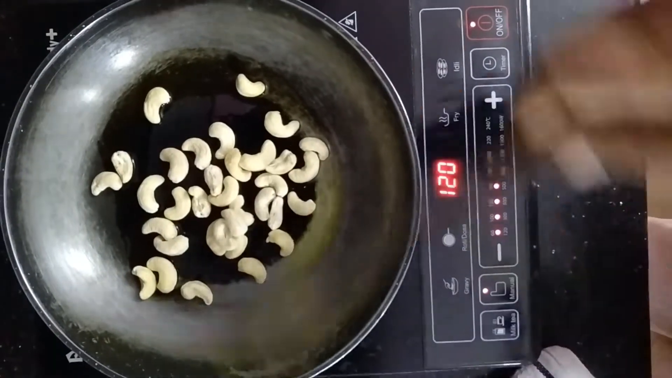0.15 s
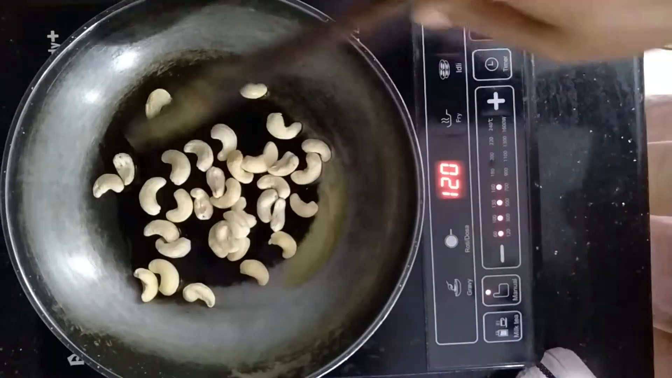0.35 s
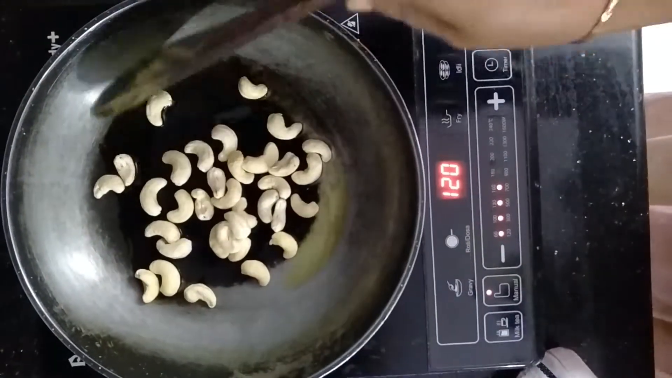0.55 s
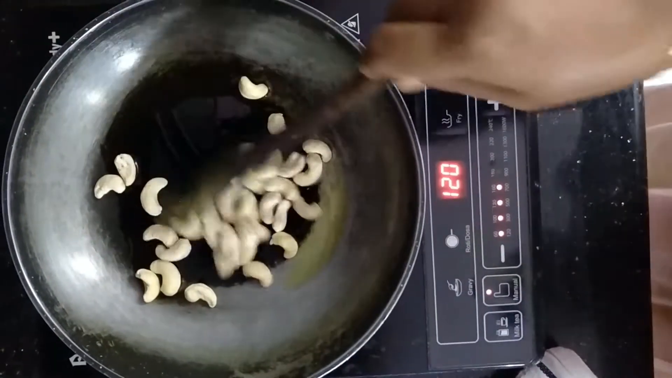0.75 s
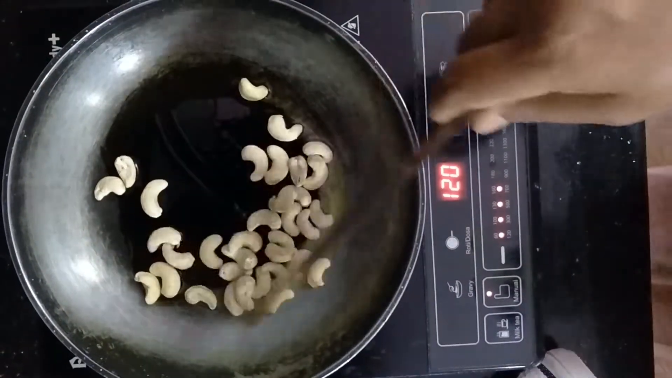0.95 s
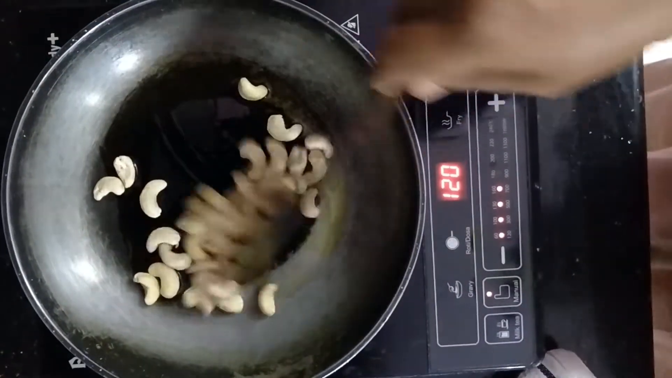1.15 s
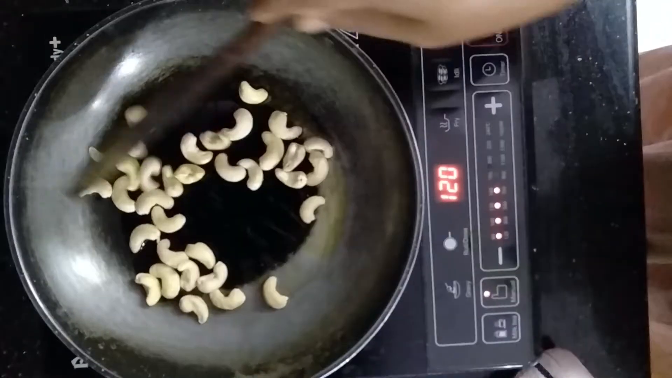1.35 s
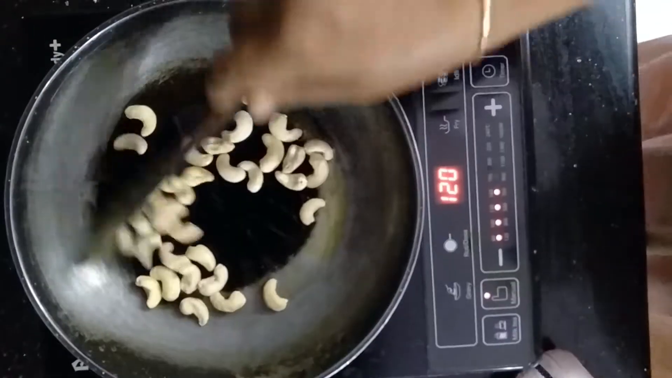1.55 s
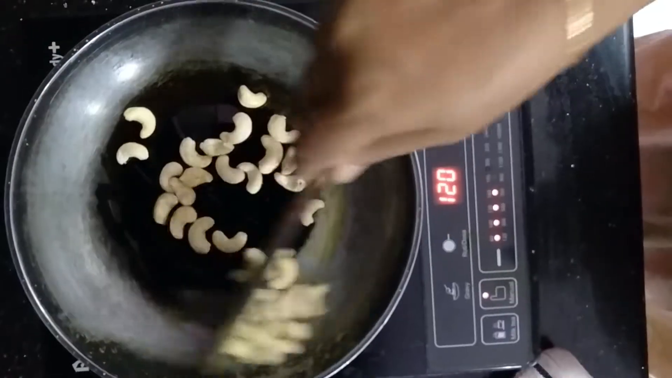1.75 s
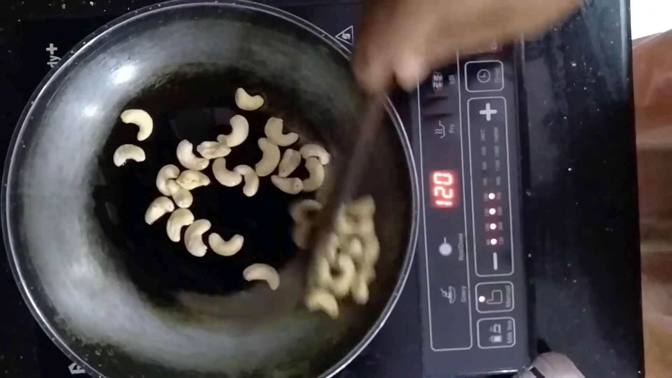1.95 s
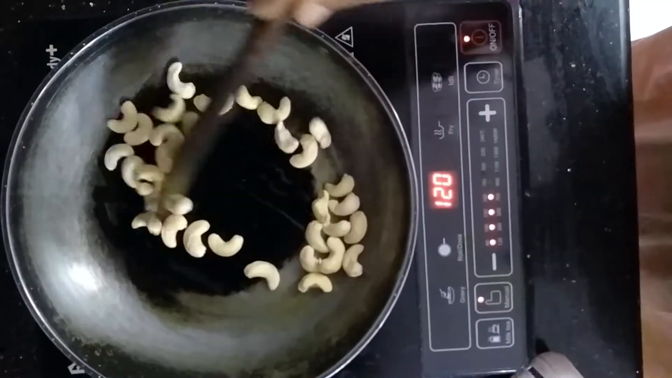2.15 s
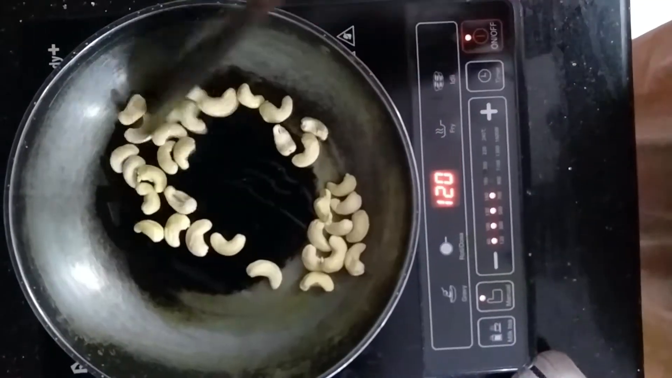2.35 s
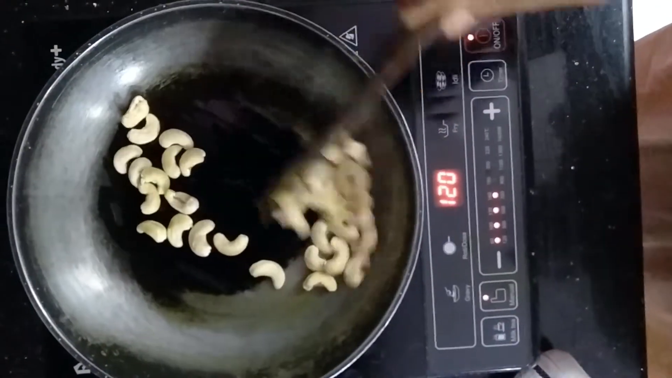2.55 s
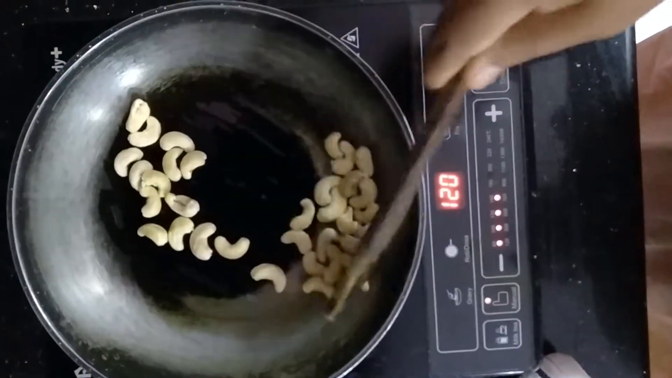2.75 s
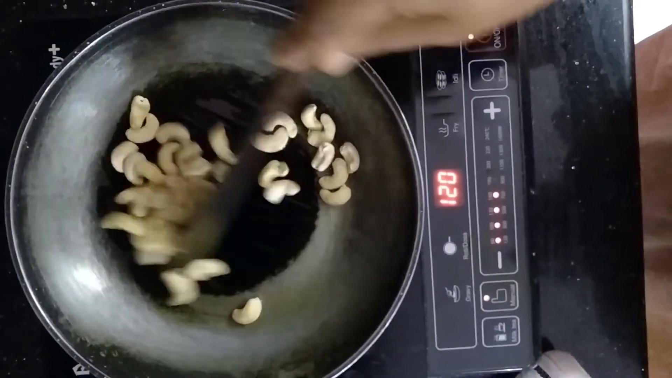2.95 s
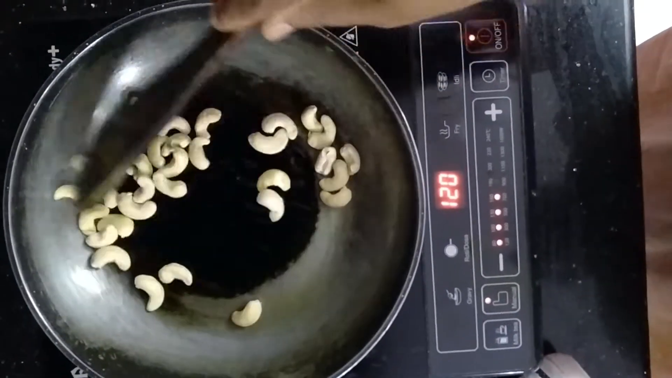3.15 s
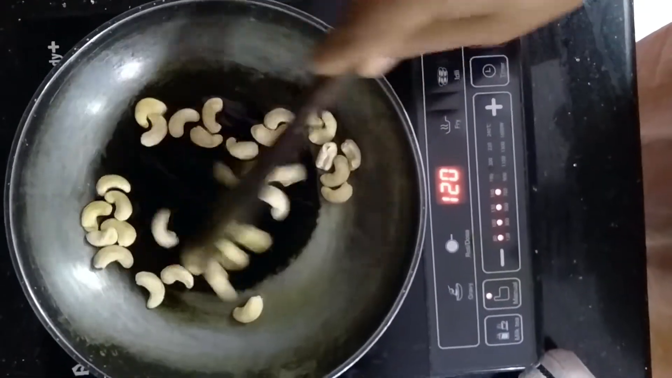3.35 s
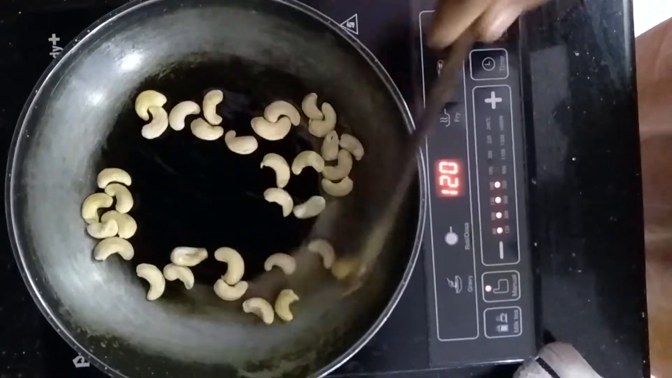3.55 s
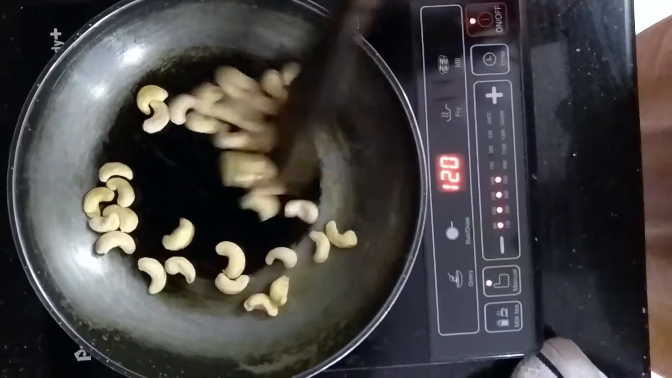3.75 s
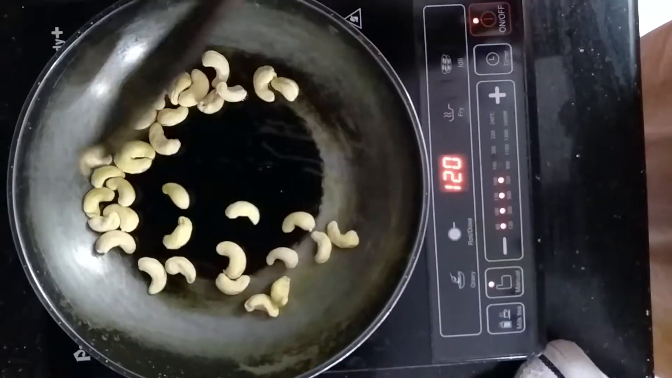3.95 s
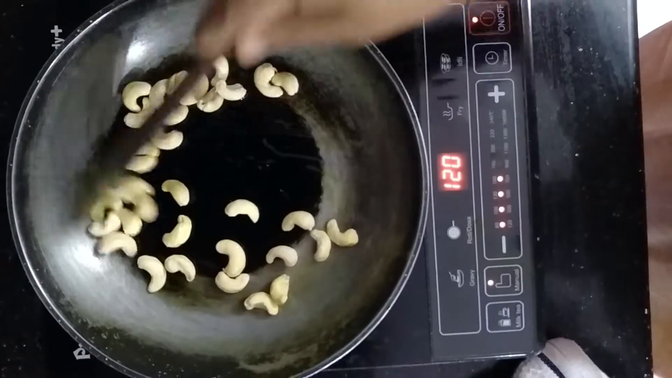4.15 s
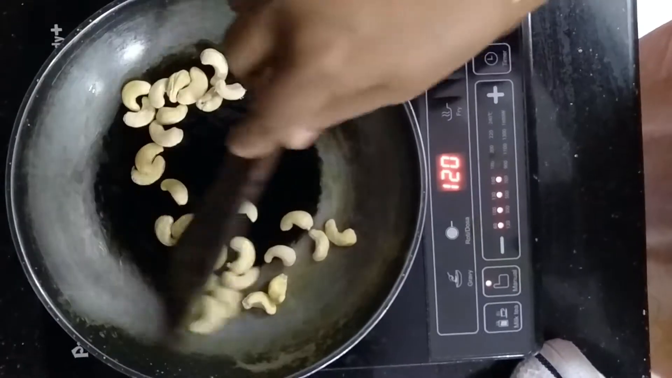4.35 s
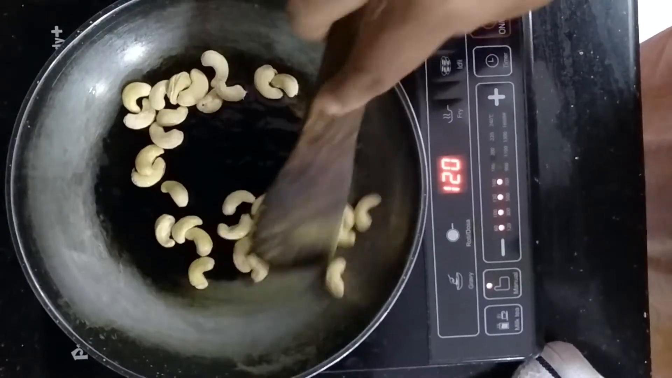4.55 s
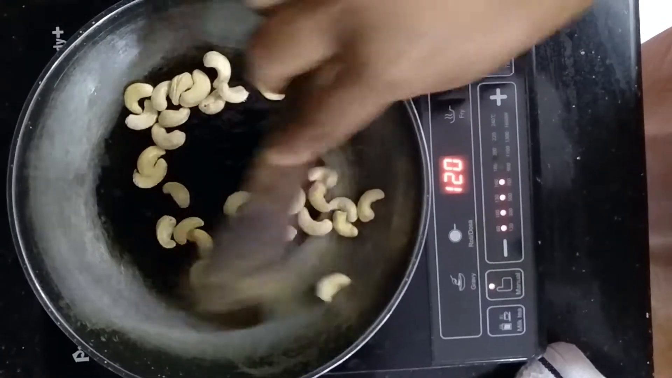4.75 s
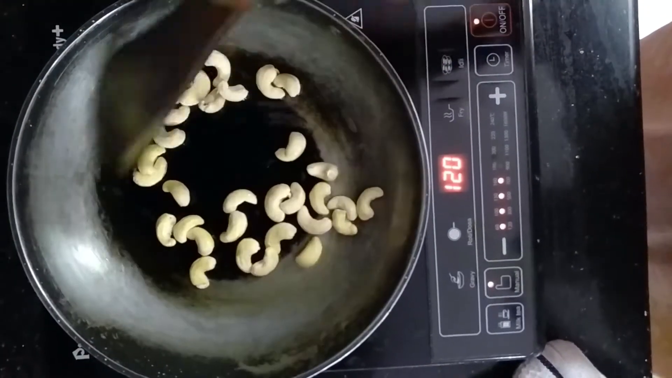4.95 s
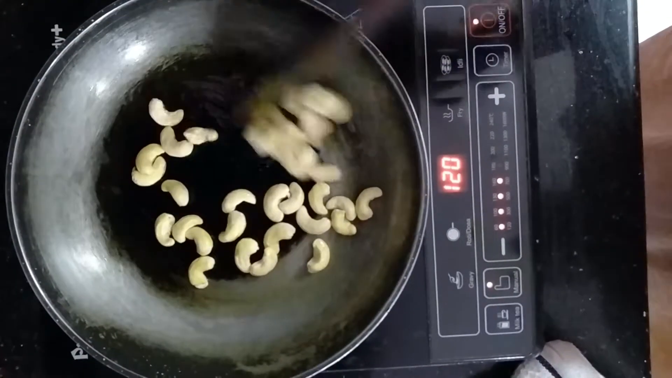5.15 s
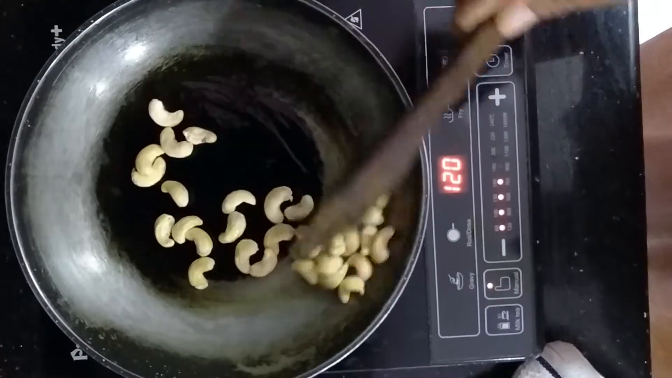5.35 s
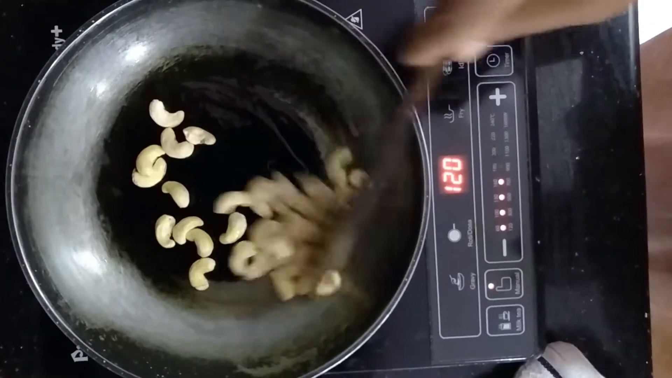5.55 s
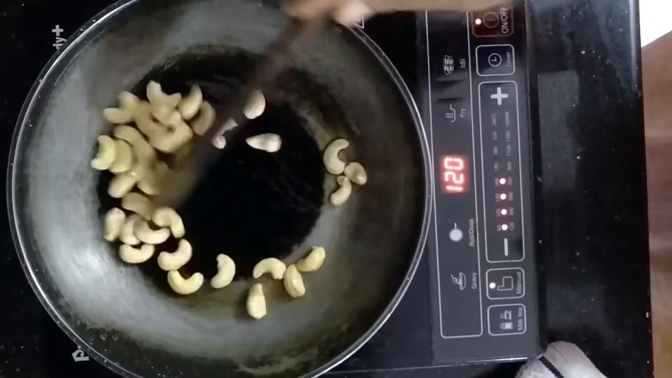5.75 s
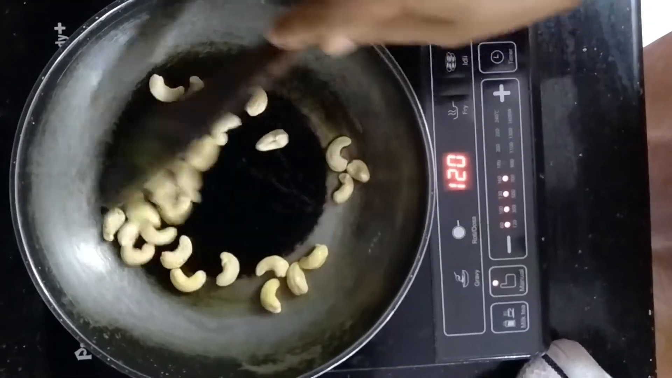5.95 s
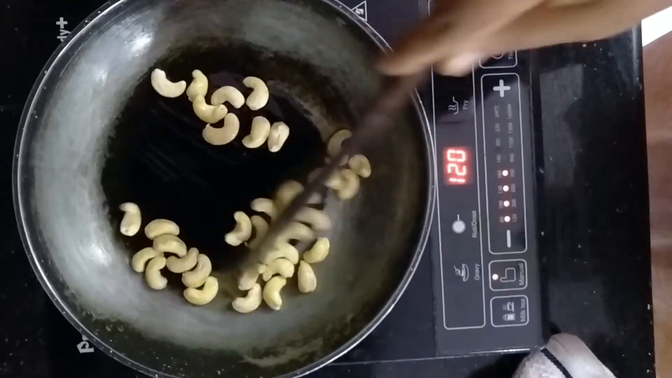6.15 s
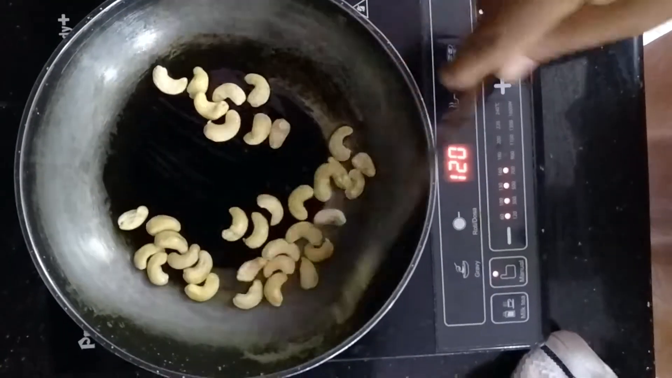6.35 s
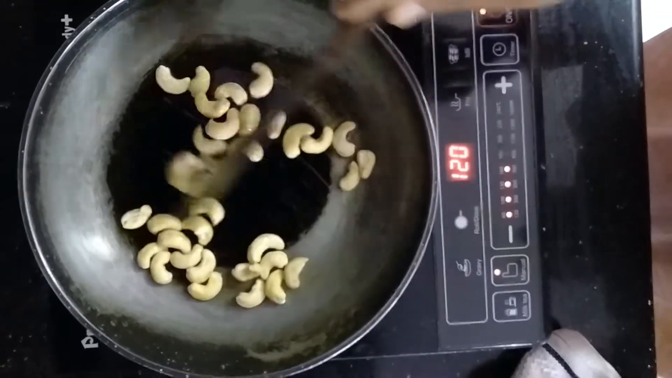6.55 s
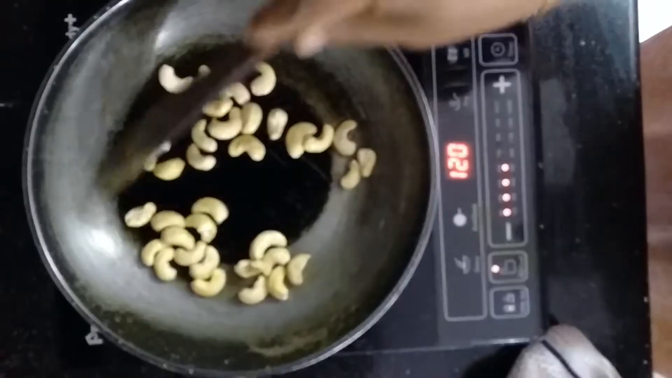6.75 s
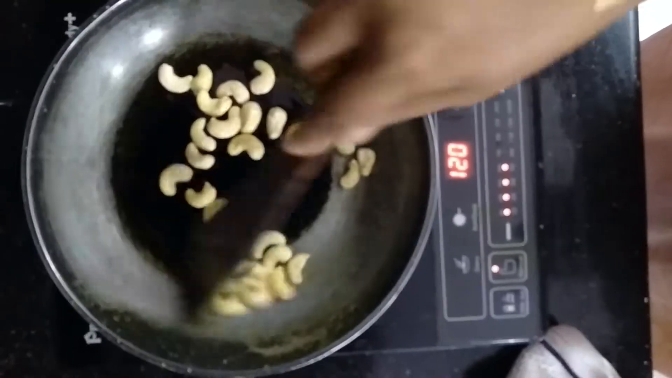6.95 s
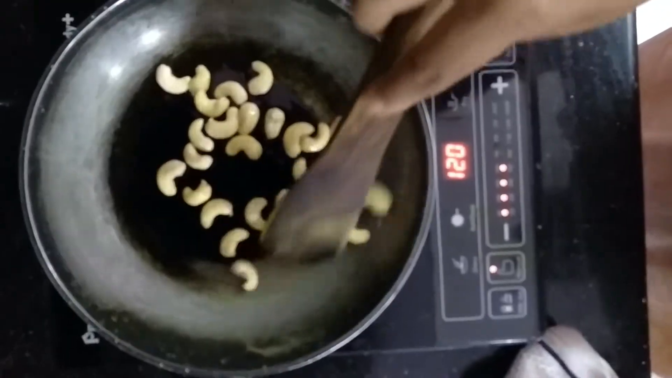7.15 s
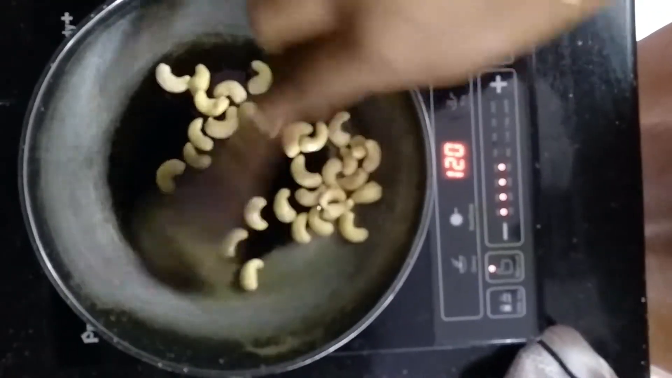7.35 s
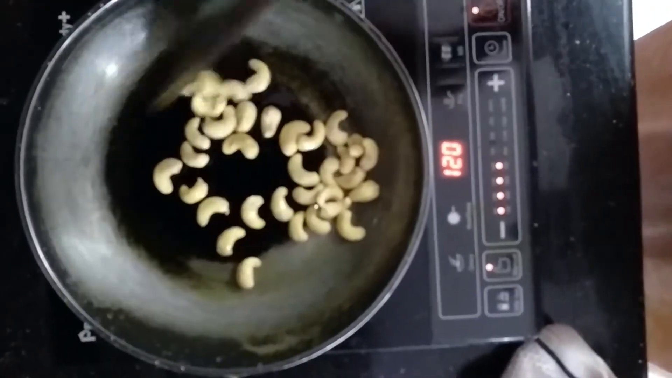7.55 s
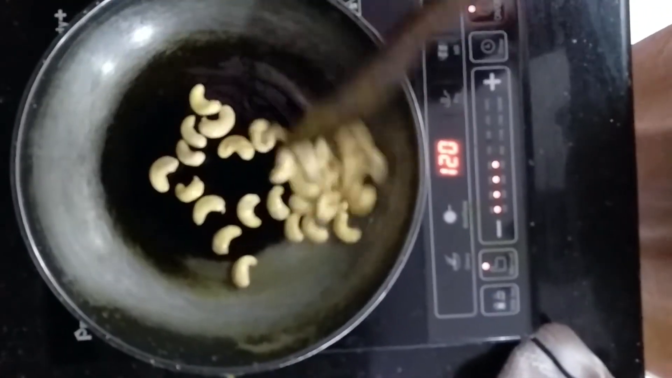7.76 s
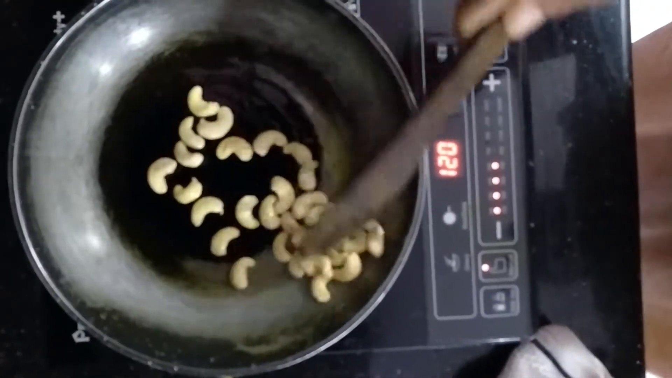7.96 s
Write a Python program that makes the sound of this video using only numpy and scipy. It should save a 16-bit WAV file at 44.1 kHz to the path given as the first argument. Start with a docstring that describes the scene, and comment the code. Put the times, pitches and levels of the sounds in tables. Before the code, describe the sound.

Nuts clack and ping in a metal pan as a wooden spatula stirs briskly, with hollow knocks, faint fizzing fat and soft fan noise.

```python
"""A wooden spatula works nuts in hot fat, in a steel pan on an induction hob, in a small kitchen.
From the start the blade drags (random slips, nut pings and fat clicks) and squeals now and then (narrow noise).
The hob whines in puffs at twice the mains rate, over soft fan noise and a hum that comes through in stretches.
From about 0.55 s nuts clack (noise bursts and steel pings) and wood knocks (a thud, then ringing pan tones).
The room answers these blows with a short tail; the hardest knocks overload a small microphone."""
import sys
import numpy as np
from scipy import signal
from scipy.fft import rfft, irfft
from scipy.io import wavfile
from scipy.ndimage import uniform_filter1d

SR = 44100
rng = np.random.default_rng(int(sys.argv[2]) if len(sys.argv) > 2 else 0)


def persist_wave(psi):
    """Save psi, clipped to +-1, as 16-bit WAV."""
    counts = np.round(np.clip(psi, -1, 1) * 32767).astype(np.int16)
    wavfile.write(sys.argv[1], SR, np.atleast_2d(counts).T)


N = 356769

# drags of the blade: start [t/s], length [t/s], then pan rumble, wood rasp, nut rattle, fat fizz [level/dB]
DRAGS = [(0.0, 0.0035, -45, -34, -49.5, -64), (0.67, 0.16, -41.5, -45, -34.5, -37),
         (1.097, 0.12, -23, -23.5, -31.5, -34.5), (1.23, 0.17, -44.5, -38, -39.5, -66),
         (1.55, 0.19, -39.5, -48, -40, -37), (2.04, 0.058, -61, -38.5, -30, -38),
         (2.44, 0.12, -77, -34.5, -43, -39.5), (2.8, 0.13, -34.5, -47, -36.5, -49),
         (2.94, 0.088, -50, -29, -34, -68), (3.18, 0.25, -45, -40.5, -49, -71),
         (3.66, 0.23, -42.5, -45, -36.5, -44.5), (4.085, 0.074, -37, -31.5, -43, -39.5),
         (4.22, 0.25, -47.5, -54, -76, -39.5), (4.51, 0.029, -48, -62, -45, -33.5),
         (4.85, 0.33, -53, -58, -59, -38.5), (5.06, 0.29, -48, -52, -42, -62),
         (5.565, 0.19, -38, -40.5, -35.5, -49.5), (6.08, 0.14, -50, -42, -44.5, -76),
         (6.44, 0.16, -44, -39, -45.5, -55.5), (6.85, 0.13, -41.5, -35, -40.5, -34.5),
         (6.97, 0.25, -47, -47, -46.5, -41), (7.475, 0.15, -70, -69, -55.5, -31),
         (7.62, 0.33, -52, -52.5, -40, -56)]
# between drags: rumble, rasp, rattle, fizz [level/dB]
DRAG_REST = (-55, -85, -62, -60)
DRAG_RISE_S, DRAG_FALL_DB_PER_S = 0.015, 183.5
RASP_HZ, RASP_OCTAVES, SLIPS_PER_S = 1450, 0.75, 600
# tones of the pan on the glass top: pitch [f/Hz], strength [level/dB], basic time to fade by 60 dB [t/s]
PAN_TONES = [(298, -8.5, 0.29), (382.5, 3, 0.1), (467.4, 3, 0.2), (563, 0.5, 0.24), (754, -1, 0.054),
             (811, -0.5, 0.19), (910, 2.5, 0.066), (993, -2.5, 0.044), (1330, -10, 0.24), (1613, 8, 0.0063)]
# tones of the steel when a nut hits it: pitch [f/Hz], strength [level/dB], basic time to fade by 60 dB [t/s]
STEEL_TONES = [(1576, -0.5, 0.058), (2043, -3, 0.062), (2452, 0, 0.032), (3036, -1.5, 0.047),
               (3968, -0.5, 0.066), (4870, -10.5, 0.06), (5790, -5.5, 0.057), (6990, -13, 0.054),
               (8720, -6.5, 0.056), (10170, -5, 0.081)]
# tone colour of the nut rattle: frequency [f/Hz], relative strength per Hz [level/dB]
RATTLE_COLOUR = [(700, -6), (1150, -25), (1600, 9.5), (2200, -1), (3000, 1), (4000, 10), (5900, 4),
                 (8000, -6.5), (12000, -2.5), (16000, -24)]
# tone colour of the fizzing fat: frequency [f/Hz], relative strength per Hz [level/dB]
SIZZLE_COLOUR = [(3500, -51), (5500, -14), (7200, -15.5), (8600, -5.5), (10200, -2.5), (12000, -7.5),
                 (14700, -12.5), (15900, -41)]
# thin fuzzy tones of the blade edge: start [t/s], end [t/s], pitch [f/Hz], strength [level/dB]
SQUEALS = [(0, 0.014, 2030, -28), (0.536, 0.862, 5890, -43.5), (1.397, 1.507, 5280, -43.5),
           (1.802, 2.06, 3970, -43.5), (3.855, 3.946, 1690, -28), (7.051, 7.52, 3520, -42.5),
           (7.498, 7.606, 5740, -49)]

POWER_PULSES_PER_S = 99.6  # twice the mains rate
# the two tones of the whine: pitch [f/Hz], width of the first filter [f/Hz]
WHINE_TONES = [(12124, 48), (12620, 90)]
# surges of the whine: start [t/s], length [t/s], lower tone, upper tone [level/dB]
WHINE_SURGES = [(0.0, 0.071, -48, -56), (0.22, 0.028, -39.5, -61), (0.385, 0.14, -35.5, -42),
                (0.78, 0.16, -37, -53), (1.05, 0.86, -47, -68), (3.215, 0.69, -38, -40.5),
                (4.1, 1.24, -45.5, -60), (7.19, 0.22, -40, -36)]
# between surges: lower tone, upper tone [level/dB]
WHINE_REST = (-56, -61)
WHINE_RISE_S, WHINE_FALL_DB_PER_S = 0.012, 127
# stretches where the hum is heard: start [t/s], length [t/s], strength [level/dB]
HUM_STRETCHES = [(0.72, 0.27, -43.5), (1.36, 0.42, -46), (2.03, 0.4, -46.5), (4.42, 0.072, -48),
                 (5.06, 0.18, -48), (5.84, 0.25, -48), (6.86, 0.54, -45)]
HUM_RISE_S, HUM_FALL_DB_PER_S, HUM_REST_DB = 0.0083, 300, -65.5
# tone colour of the fan: frequency [f/Hz], relative strength per Hz [level/dB]
FAN_COLOUR = [(88, -70), (170, 1), (455, 1), (785, 13.5), (1110, -3), (1580, 6.5), (6190, -33.5),
              (10500, -10), (12500, -2.5), (15800, -10)]
FAN_DB = -49.5

# nuts struck or landing: time [t/s], strength [level/dB], clack pitch [f/Hz], tick against the clack [level/dB]
CLACKS = [(0.5507, -27, 1670, 2), (0.6732, -10, 2290, -11.5), (0.7687, -11, 2450, -4),
          (0.833, -16, 1430, -3), (0.868, -19.5, 2250, -7), (0.988, -28, 4270, -2.5),
          (1.1206, -9, 1250, -4.5), (1.154, -7, 1610, -0.5), (1.196, -14.5, 1960, -20),
          (1.214, -18.5, 5750, 3), (1.297, -23, 5670, -7), (1.3652, -9.5, 1790, -14),
          (1.535, -5.5, 1340, -9), (1.5506, -8.5, 2440, 3.5), (1.58, -15.5, 2660, -19),
          (1.6067, -17, 2060, -5), (1.6506, -12, 2420, -9), (1.7217, -20.5, 2200, -17),
          (1.886, -31, 3900, -30), (1.916, -24.5, 5600, -41), (1.964, -19, 2770, -11.5),
          (2.019, -19.5, 2200, -9), (2.0338, -13, 2650, -20), (2.0455, -29, 2100, -12),
          (2.0625, -7, 2100, -0.5), (2.0878, -16, 1820, -5), (2.098, -23, 2400, 4), (2.141, -30, 4300, 0),
          (2.1992, -22.5, 3760, -22), (2.208, -23, 5830, -28), (2.241, -19.5, 3800, -43),
          (2.396, -17.5, 3250, -6), (2.427, 1, 1510, -12.5), (2.4984, -15.5, 1490, -5),
          (2.5732, -20, 4130, -9), (2.7736, -19, 3180, -39), (2.817, -21, 3530, -29),
          (2.833, -22.5, 1690, 3.5), (2.858, -19.5, 2120, 0), (2.916, -25.5, 4100, -4),
          (2.9613, -11, 1400, 5), (2.986, -13.5, 1490, -26), (2.999, -32, 3000, 0.5),
          (3.026, -26, 3230, -5), (3.038, -13.5, 1520, -4), (3.09, -10.5, 1400, -8),
          (3.109, -18, 1650, -21), (3.1336, -14.5, 1490, -31), (3.1615, -25, 1720, -28),
          (3.189, -27, 2000, -34), (3.3005, -27.5, 4000, -5), (3.1998, -10, 1800, 2),
          (3.2287, -7, 2200, -10), (3.3513, -14.5, 1580, -23.5), (3.375, -22.5, 3630, -9),
          (3.398, -15, 1930, -11.5), (3.472, -15.5, 1940, -35), (3.5281, -12, 3680, -5),
          (3.6375, -11.5, 1270, -1.5), (3.705, -10, 2680, -2.5), (3.762, -13.5, 2370, -2),
          (3.7834, -19, 1760, -25), (3.794, -17, 1670, -13.5), (3.814, -17, 2380, -15),
          (3.838, -22, 3960, -19), (3.9498, -20, 1370, -6), (3.9783, -23, 1500, -50.5),
          (4.099, -13.5, 1480, -19), (4.1573, -10.5, 1880, -7.5), (4.2103, -11.5, 2090, -9),
          (4.2577, -23.5, 2900, 7), (4.3066, -23.5, 1720, -5), (4.426, -36.5, 3700, 5),
          (4.5175, -28.5, 4200, 1), (4.7584, -21.5, 1530, -2.5), (4.9419, -34.5, 5400, 8),
          (5.042, -12, 2370, 0), (5.075, -26, 2900, -17), (5.125, -19.5, 2140, -18),
          (5.143, -13.5, 2210, -3), (5.239, -30.5, 4540, 7), (5.266, -32, 4000, -20),
          (5.277, -19.5, 3170, -5), (5.285, -24.5, 3530, -10), (5.298, -40, 4000, -30),
          (5.329, -33, 4000, -31), (5.339, -22.5, 1640, -9), (5.377, -19, 1650, -1.5),
          (5.4603, -18, 1830, -16), (5.596, -18, 1710, -0.5), (5.62, -1.5, 1650, -14),
          (5.706, -28.5, 2500, 2), (5.7739, -17.5, 2370, -2), (6.094, -28, 1520, 0),
          (6.117, -18.5, 1500, -15), (6.199, -24, 3180, -37), (6.253, -26.5, 1670, -16),
          (6.2853, -26, 2880, -13), (6.3901, -5.5, 1300, -12), (6.474, -5.5, 2100, -6.5),
          (6.5064, -15.5, 1870, -13), (6.515, -9.5, 1970, -4.5), (6.569, -17.5, 1480, -42),
          (6.836, -16.5, 1410, -5.5), (6.88, -16, 2140, -24), (6.9116, -11.5, 2270, -4),
          (6.9204, -12.5, 2250, -4.5), (6.9352, -10.5, 2340, -5), (7.016, -15.5, 2230, -5.5),
          (7.044, -19, 2210, -23), (7.1021, -17.5, 1820, 2.5), (7.182, -21.5, 3070, -28),
          (7.2816, -19, 1700, -10), (7.3237, -4.5, 1470, -9), (7.6118, -9, 2530, -8),
          (7.638, -16, 2740, -10), (7.717, -14, 2100, -5.5), (7.794, -28, 2010, -22),
          (7.8421, -13, 2360, -10), (7.8701, -16, 1780, -11), (7.949, -25.5, 1680, -29),
          (8.0683, -14.5, 2440, -5)]
# spatula meets pan: time [t/s], strength [level/dB], contact pitch [f/Hz], ring against the thud [level/dB]
KNOCKS = [(0.554, -31, 690, 24.5), (0.572, -8, 555, -15), (0.775, -14.5, 1130, 1.5), (1.104, -23, 760, 18),
          (1.118, -16, 855, 10.5), (1.154, -18.5, 880, 10), (1.537, -6.5, 800, -1.5), (2.43, -2, 780, -6),
          (2.775, -4.5, 420, 2.5), (3.639, -2.5, 550, 1.5), (3.704, -9.5, 570, 0), (4.11, -4, 814, -4.5),
          (4.129, -11, 930, -1), (4.759, 3.5, 685, -10), (5.462, -9, 343, -5), (5.62, -2, 680, -10),
          (5.932, -22, 420, -0.5), (6.393, -1, 774, -12), (6.843, -7, 790, 1.5), (6.861, -4.5, 875, -0.5),
          (7.325, 4, 770, -10), (8.073, -44.5, 603, 25.5)]
# how long the room rings: frequency [f/Hz], time to fade by 60 dB [t/s]
ROOM_FADE = [(300, 0.41), (1000, 0.31), (3000, 0.15), (10000, 0.18)]
MICROPHONE_TOP_HZ = 15850


def gain_of(db):
    """Turns decibels into a factor for the wave."""
    return 10 ** (np.asarray(db) / 20)


def evened(x):
    """Brings a sound to an average (RMS) strength of 1."""
    return x / np.sqrt(np.mean(x ** 2) + 1e-20)


def read(points, hz):
    """Reads a curve between its points, with frequency on a logarithmic scale."""
    f, value = np.transpose(points)
    return np.interp(np.log(hz + 1), np.log(f + 1), value)


def add(mix, s, sound):
    """Adds a sound to the mix, starting s seconds in."""
    part = mix[round(s * SR):][:len(sound)]
    part += sound[:len(part)]


def band(x, hz, octaves):
    """Keeps one broad hump of frequencies around hz; octaves sets its width."""
    f = np.fft.rfftfreq(len(x), 1 / SR)
    hump = np.exp(-(np.log2((f + 1) / hz) / octaves) ** 2)
    return irfft(rfft(x) * hump, len(x))


def colour(x, points, patchy_db):
    """Shapes x by a spectrum, with random patches drifting over time and frequency."""
    hz, _, z = signal.stft(x, SR, nperseg=512, noverlap=384)
    patches = rng.standard_normal(z.shape[::-1]).T
    patches = uniform_filter1d(patches, size=5, axis=0)  # smooth over frequency
    patches = evened(uniform_filter1d(patches, size=22, axis=1))  # smooth over time
    gain = gain_of(read(points, hz)[:, None] + patchy_db * patches)
    shaped = signal.istft(z * gain, SR, nperseg=512, noverlap=384)[1]
    return evened(shaped[:N])


def grains(per_s, spread_db):
    """Sparse clicks at random times and of random sign; a few are large."""
    hit, size, sign = rng.random((N, 3)).T
    sizes = gain_of(-spread_db * np.log(np.maximum(size, 0.01)))
    return (hit < per_s / SR) * sizes * np.sign(sign - 0.5)


def resonate(x, hz, width):
    """A resonance of gain 1: shifts the pitch hz down to zero, smooths, and shifts back."""
    turn = np.exp(2j * np.pi * np.cumsum(hz * np.ones(len(x))) / SR)
    r = np.exp(-np.pi * width / SR)
    return 2 * (turn * signal.lfilter([1 - r], [1, -r], x / turn)).real


def gains_over_time(rows, rise_s, fall_db_per_s, rest_db):
    """Gain of each column: every row rises, holds for its length and dies away to a resting level."""
    t = np.arange(N) / SR
    power = gain_of(rest_db)[:, None] ** 2
    for start, length, *db in rows:
        rise = np.clip((t - start) / rise_s, 0, 1)
        fall = gain_of(-fall_db_per_s * np.clip(t - start - length, 0, 1))
        power = power + (gain_of(db)[:, None] * rise * fall) ** 2
    return np.sqrt(power)


def jostle(count):
    """Small nut collisions: noisy pings of several pitches, each in its own sparse train; the steel rings along."""
    t, out = np.arange(1024) / SR, np.zeros(N)
    for hz in np.geomspace(1400, 8000, count):
        ping = band(rng.standard_normal(len(t)), hz, 0.3)
        ping *= gain_of(-60 * t / 0.014) * (1 - np.exp(-t / 0.0004))
        out += signal.oaconvolve(grains(45, 3.5), ping / np.linalg.norm(ping))[:N]
    steel = sum(gain_of(db) * resonate(out, hz, 0.47 / t60) for hz, db, t60 in STEEL_TONES)
    return evened(out + 0.29 * steel)


def stroke():
    """The blade drags: slips shake the pan tones, wood rasps, nuts jostle over a gritty hiss, fat fizzes."""
    shake, press, push, fizz = gains_over_time(DRAGS, DRAG_RISE_S, DRAG_FALL_DB_PER_S, DRAG_REST)

    t = np.arange(round(0.2 * SR)) / SR
    pan = sum(gain_of(db - 60 * t / (0.28 * t60)) * np.sin(2 * np.pi * (hz * t + rng.random()))
              for hz, db, t60 in PAN_TONES)
    rumble = evened(signal.oaconvolve(grains(500, 0.79), pan)[:N])
    rasp = evened(band(grains(SLIPS_PER_S, 0.58), RASP_HZ, RASP_OCTAVES))

    busy = np.clip(push / gain_of(-45), 0, 1)  # nuts jostle fully only under a firm stroke
    grit = busy * jostle(count=16) + 0.45 * rng.standard_normal(N)
    rattle = colour(grit, RATTLE_COLOUR, 3)

    spit = grains(4000, 3.2)
    steel = sum(gain_of(db) * resonate(spit, hz, 250) for hz, db, _ in STEEL_TONES)
    sizzle = colour(spit + 0.75 * steel, SIZZLE_COLOUR, 7)  # the steel colours the fizz
    return shake * rumble + press * rasp + push * rattle + fizz * sizzle


def squeals():
    """The wet blade edge sings briefly on the steel: narrow noise that swells, wavers and fades."""
    out = np.zeros(N)
    for start, end, hz, db in SQUEALS:
        noise = rng.standard_normal(SR // 2)[:round((end - start) * SR)]
        tone = evened(resonate(resonate(noise, hz, 90), hz, 700))
        waver = gain_of(1.4 * evened(uniform_filter1d(noise, size=900)))
        add(out, start, gain_of(db) * tone * np.sqrt(np.hanning(len(tone))) * waver)
    return out


def hob():
    """The coil makes the pan base sing in puffs, one each power pulse; a fluttering hum and fan noise lie below."""
    turns = POWER_PULSES_PER_S * np.arange(N) / SR + 0.43
    pulse_gains = gain_of(rng.standard_normal(int(turns[-1]) + 2))
    strength = pulse_gains[np.round(turns).astype(int)]  # each puff differs a little
    puffs = 0.4 + strength * np.cos(np.pi * turns) ** 4

    surges = gains_over_time(WHINE_SURGES, WHINE_RISE_S, WHINE_FALL_DB_PER_S, WHINE_REST)
    whine = np.zeros(N)
    for gain, (hz, width) in zip(surges, WHINE_TONES):
        tone = resonate(resonate(rng.standard_normal(N), hz, width), hz, 690)
        whine += gain * evened(puffs * tone)

    drift = uniform_filter1d(uniform_filter1d(rng.standard_normal(N), size=1100), size=1100)
    flutter = gain_of(5.5 * evened(drift))
    hum = sum(gain_of(db) * np.sin(2 * np.pi * k * turns) for k, db in enumerate([-1, 0, -7], start=1))
    hum_gain = gains_over_time(HUM_STRETCHES, HUM_RISE_S, HUM_FALL_DB_PER_S, [HUM_REST_DB])[0]

    fan = colour(rng.standard_normal(N), FAN_COLOUR, 5.7)
    return whine + hum_gain * evened(flutter * hum) + gain_of(FAN_DB) * fan


def clacks():
    """Each nut gives a dry burst, a treble tick, a brief ring of the nearest steel tones, then one softer bounce."""
    out, t = np.zeros(N), np.arange(2048) / SR
    hz, db, t60 = np.transpose(STEEL_TONES)[:, :, None]
    noise = rng.standard_normal((len(CLACKS), 2, len(t)))
    luck = rng.standard_normal((len(CLACKS), 2, len(STEEL_TONES), 1))
    bounces = rng.random((len(CLACKS), 3))
    for (s, level_db, pitch, tick_db), (a, b), (stray, spot), (tone, wait, soft) in zip(
            CLACKS, noise, luck, bounces):
        modes = np.sin(2 * np.pi * hz * (1 + 0.045 * stray) * t + 2 * spot)
        ring_db = db - 24 * abs(np.log2(hz / pitch)) - 60 * t / (0.5 * t60)
        ring = (gain_of(ring_db) * modes).sum(0)
        burst = evened(band(a, pitch, 0.52)) * gain_of(-60 * t / 0.024)

        # the tick pings the high steel tones
        edge_hz = 4500 + 4500 * tone
        ping_db = db + 6 * spot - 15 * abs(np.log2(hz / edge_hz)) - 60 * t / (0.4 * t60)
        ping = (gain_of(ping_db) * modes).sum(0)
        tick = 0.6 * evened(band(b, edge_hz, 0.6)) * gain_of(-60 * t / 0.018)
        tick = gain_of(tick_db) * (tick + 1.5 * ping / abs(ping).max()) * (1 - np.exp(-t / 0.00022))

        # heavy nuts, with a low pitch, shake the pan more
        thump_db = -16 - 19 * np.log2(pitch / 1600) - 60 * t / 0.088
        thump = evened(band(a, 803, 0.15)) * gain_of(thump_db)

        clack = 1.1 * ring / abs(ring).max() + 0.9 * burst + tick + thump
        clack *= (1 - np.exp(-t * pitch / 1.8)) ** 2  # small nuts speak faster
        clack *= 1 + 0.6 * np.exp(-t / 0.002)  # the first contact is the sharpest
        add(out, s, gain_of(level_db) * clack)
        add(out, s + 0.004 + 0.01 * wait, gain_of(level_db - 5.5 - 20 * soft) * clack)
    return out


def knocks():
    """A short wooden thud; the pan tones nearest its pitch ring on while the pan chatters on the glass."""
    out, t = np.zeros(N), np.arange(round(0.4 * SR)) / SR
    hz, db, t60 = np.transpose(PAN_TONES)[:, :, None]
    luck = rng.standard_normal((len(KNOCKS), 2, len(PAN_TONES), 1))
    noise = rng.standard_normal((len(KNOCKS), len(t)))
    for (s, level_db, pitch, ring_db), (spot, phase), hiss in zip(KNOCKS, luck, noise):
        modes = np.sin(2 * np.pi * hz * (1 + 0.017 * spot) * t + 1.18 * phase)
        near_db = db - 13.3 * abs(np.log2(hz / pitch)) + 2.4 * spot
        thud = (gain_of(near_db - 60 * t / 0.021) * modes).sum(0) * (1 - np.exp(-t / 0.015))

        # the tail favours the lower tones
        low_db = db - 13.2 * abs(np.log2(hz / (0.85 * pitch))) + 2.5 * spot
        ring = (gain_of(low_db - 60 * t / t60) * modes).sum(0)
        chatter = 1.1 * evened(band(hiss, pitch, 0.65)) * gain_of(-60 * t / 0.14)
        ring = (ring / abs(ring).max() + chatter) * (1 - np.exp(-t / 0.027))
        add(out, s, gain_of(level_db) * (thud / abs(thud).max() + gain_of(ring_db) * ring))
    return out


def kitchen(x):
    """Room echoes: sparse taps of random sign, each frequency dying at its own speed."""
    taps = np.zeros(SR // 2)
    at = np.arange(150, len(taps) - 20, 20)
    taps[at + rng.integers(0, 20, len(at))] = rng.choice([-1.0, 1.0], len(at))
    hz, t, z = signal.stft(taps, SR, nperseg=256)
    fade = gain_of(-60 * t / read(ROOM_FADE, hz)[:, None])
    tail = signal.istft(z * fade, SR, nperseg=256)[1]
    return signal.oaconvolve(x, tail / np.linalg.norm(tail))[:N]


def scene():
    """Adds all sources; only the knocks and clacks excite the room."""
    blows, nuts = knocks(), clacks()
    wet = kitchen(gain_of(-13.5) * blows + gain_of(-8.5) * nuts)
    return (blows + nuts + wet + stroke() + squeals() + hob())[None]


def record(dry):
    """The small microphone drops the deep bass; the loudest knocks hit full scale; then the top treble is cut."""
    thin = signal.sosfilt(signal.butter(3, 105, "high", fs=SR, output="sos"), dry)
    clipped = np.clip(thin, -1, 1)
    treble_cut = signal.firwin(511, MICROPHONE_TOP_HZ, window=("kaiser", 9), fs=SR)
    return signal.oaconvolve(clipped, treble_cut[None], "same")


dry = scene()
out = record(dry)
persist_wave(out)
```